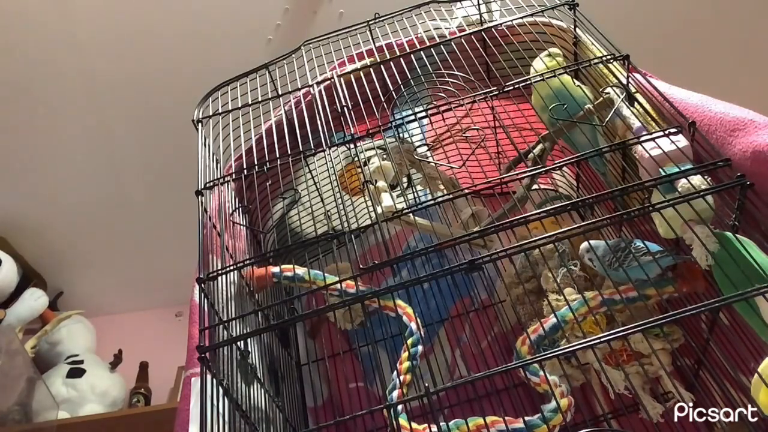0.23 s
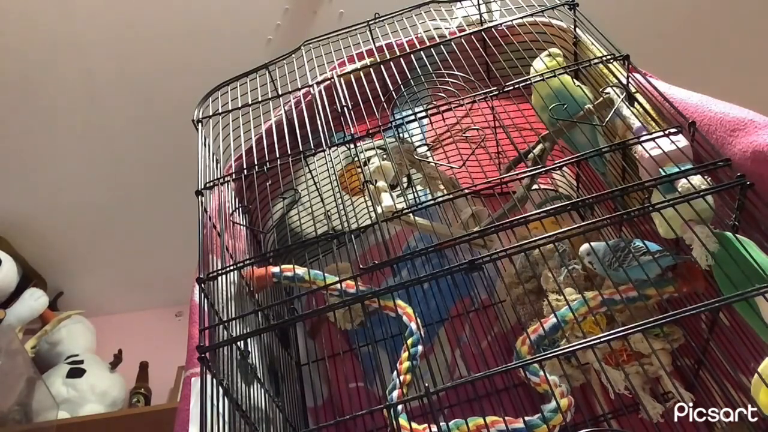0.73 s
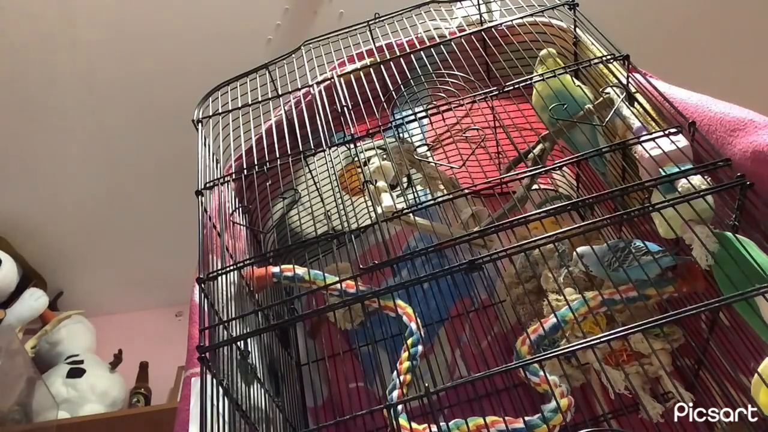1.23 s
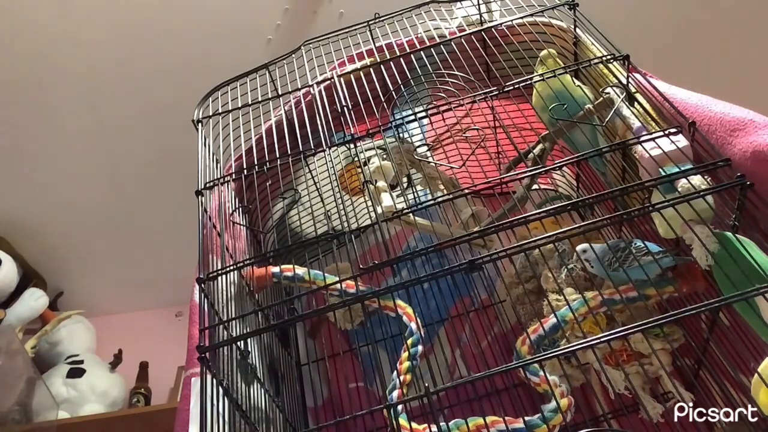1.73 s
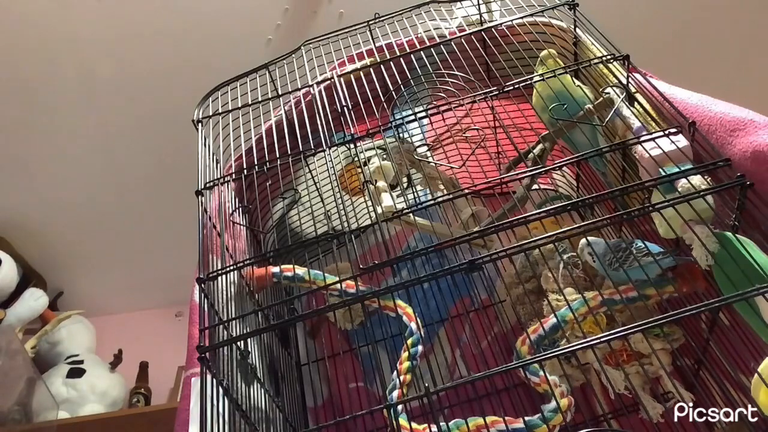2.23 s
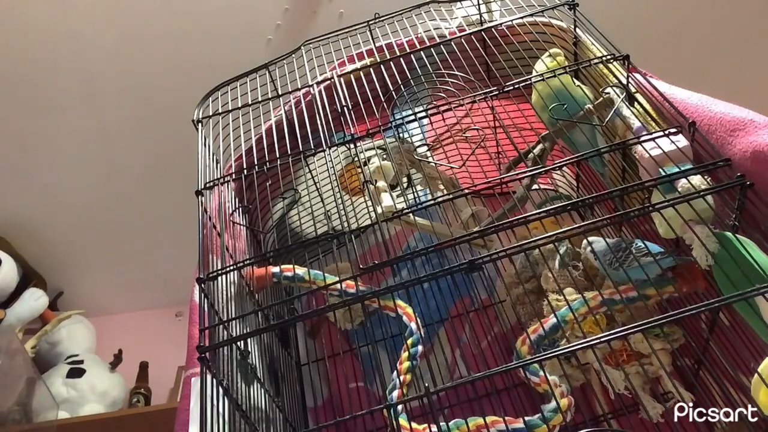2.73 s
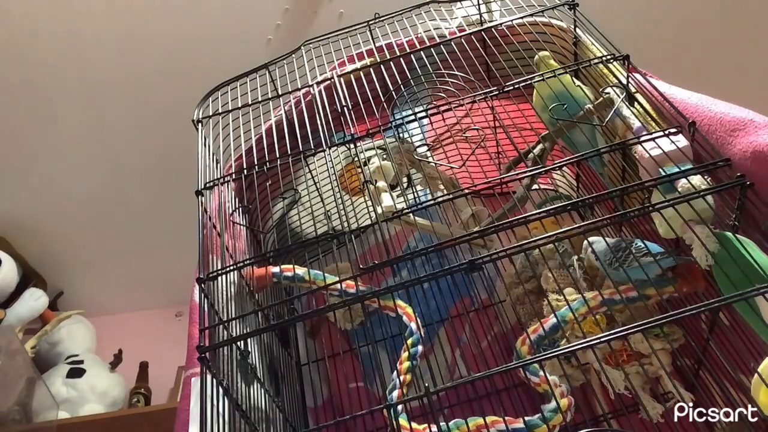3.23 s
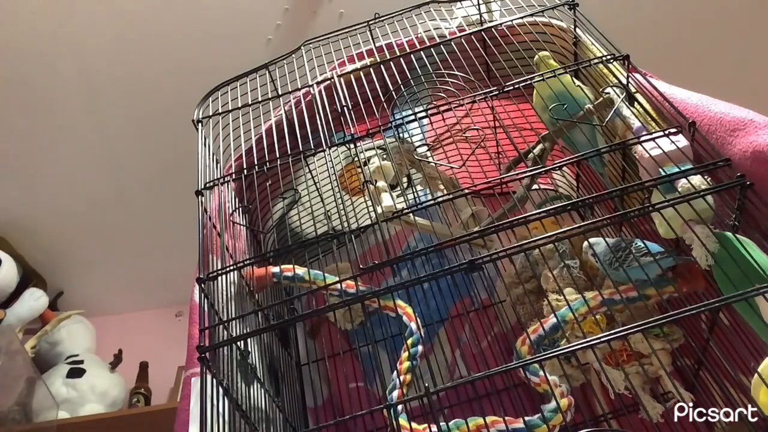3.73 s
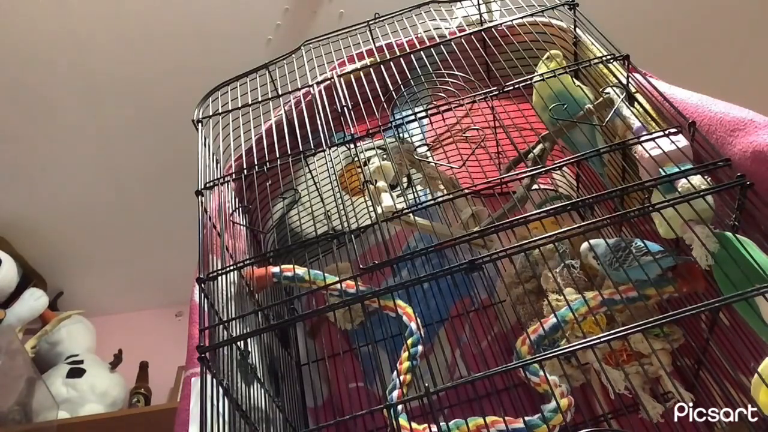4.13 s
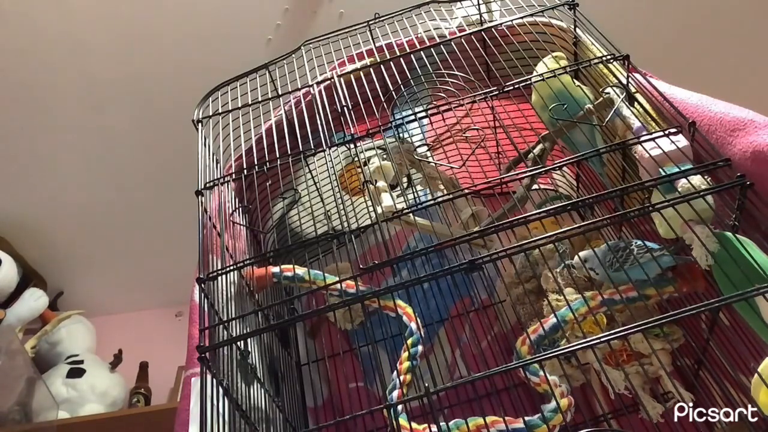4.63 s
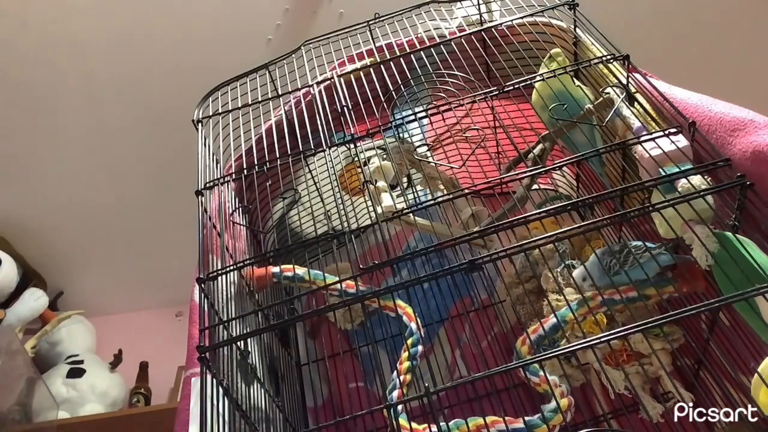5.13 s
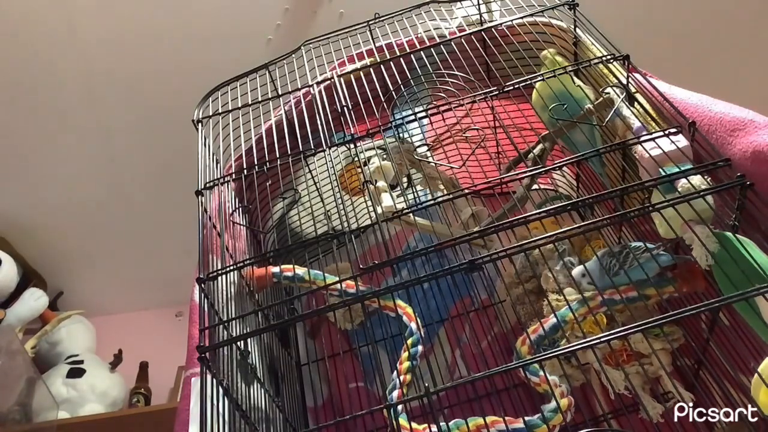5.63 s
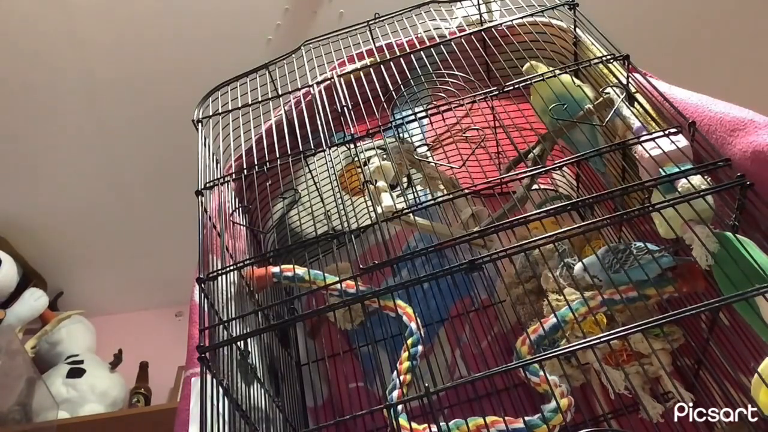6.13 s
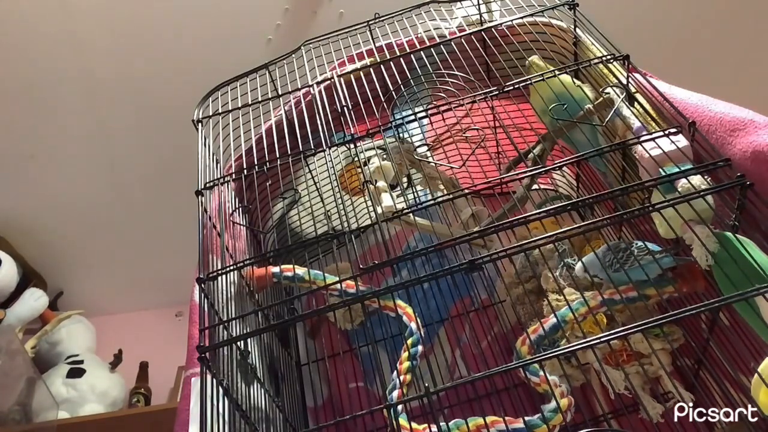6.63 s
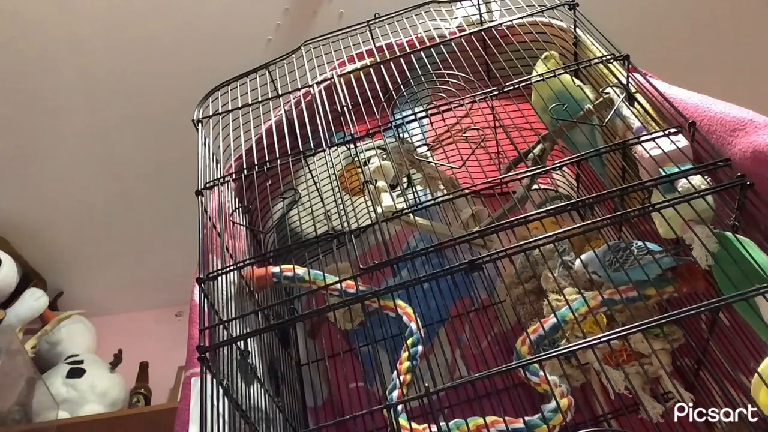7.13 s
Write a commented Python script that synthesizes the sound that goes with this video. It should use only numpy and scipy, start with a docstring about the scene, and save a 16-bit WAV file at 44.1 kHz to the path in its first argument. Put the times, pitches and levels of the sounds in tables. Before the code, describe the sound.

Several caged budgies chatter and warble in a small room, with dry clucks, raspy scolding, and a close bird's sudden sharp whistles and harsh squawks.

```python
"""Caged budgerigars in a small room.

Gliding warble syllables and peeps (rough near-sine tones) ring the resonances of the cage corner.
Clucks and raspy scolding are noise gated by uneven puffs; shuffles and taps are coloured noise.
A close bird whistles (wavering tones) and squawks (pulsed chaotic tone and noise).
Noise-tail reverb gives the short room ring; filtered noise gives the still air."""
import sys
import numpy as np
from scipy import signal
from scipy.fft import rfft, irfft
from scipy.io import wavfile

SR = 44100
rng = np.random.default_rng(int(sys.argv[2]) if len(sys.argv) > 2 else 0)


def unload_wav(signal):
    """Save mono or channel-first audio to the path in sys.argv[1] as 16-bit WAV at rate SR, clipped to [-1, 1]."""
    wavfile.write(
        sys.argv[1],
        SR,
        np.round(np.clip(np.atleast_2d(signal).T, -1, 1) * 32767).astype(np.int16),
    )


N = 325899

# Levels of events are source levels, ahead of any later colouring and room.
# Still room air, spectrum: hz, gain_db
AIR_SPECTRUM = [(20, -32), (45, -23), (65, -9.5), (100, -9.5), (300, -10.5), (700, -16), (2000, -3.5),
                (6000, -23), (16000, -32.5)]
# Birds shuffling on the perches: start_s, length_s, level_db
SHUFFLES = [(1.769, 0.11, -65), (3.621, 0.2, -57.5), (4.068, 0.329, -54)]
# Shuffle spectrum: hz, gain_db
SHUFFLE_SPECTRUM = [(40, -15), (100, 0.5), (260, 1.5), (400, 14), (580, 0.5), (750, -6), (1500, -32)]
# Beak and claw taps on the cage: start_s, level_db
TAPS = [(2.973, -33.5), (4.139, -29)]
# Tap spectrum: hz, gain_db
TAP_SPECTRUM = [(100, -46), (1500, -19), (3600, -1), (7000, 6), (12000, -2), (16000, -14)]
# Clucks: start_s, length_s, throat_db, edge_db
CLUCKS = [(0.173, 0.028, -33.5, -46), (0.71, 0.014, -55, -36.5), (0.863, 0.025, -31.5, -50),
          (1.492, 0.024, -43, -50), (1.797, 0.068, -40.5, -51), (2.054, 0.044, -49, -50),
          (2.141, 0.041, -31.5, -45), (2.711, 0.074, -37.5, -45), (3.05, 0.015, -28, -25),
          (3.337, 0.03, -29, -33), (3.616, 0.052, -49, -51), (3.721, .048, -38.5, -34),
          (3.923, 0.0354, -39, -43), (4.137, 0.0094, -34, -26), (4.341, 0.018, -32.5, -31),
          (5.476, 0.026, -33, -52), (5.549, 0.037, -35.5, -46.5), (5.937, .025, -56.5, -26),
          (7.16, 0.014, -30, -51)]
# Hollow throat of a cluck, spectrum: hz, gain_db
THROAT_SPECTRUM = [(70, -51), (450, -13.5), (900, -12), (1450, 6.5), (1900, -6), (2300, 9), (2600, 2),
                   (3000, 7), (4200, -8), (6000, -33.5)]
# Sharp edge of a cluck, spectrum: hz, gain_db
EDGE_SPECTRUM = [(100, -43), (1500, -5.5), (3600, 9.5), (4800, -1.5), (6200, 1), (7600, -3.5),
                 (9500, -11.5), (16000, -49)]
# Raspy scolding: start_s, length_s, level_db
RASPS = [(0.86, 0.24, -44), (4.428, 0.15, -24.5), (4.598, 0.19, -27.5), (4.815, 0.22, -27.5),
         (5.04, 0.18, -26.5)]
# Scolding spectrum: hz, gain_db
RASP_SPECTRUM = [(150, -70), (800, -32), (1400, -6.5), (2700, 3.5), (4500, 5), (6500, 8.5), (7500, 5),
                 (8400, -0.5), (10500, -7.5), (16000, -24.5)]
# Warble syllables, arches of pitch: top_time_s, climb_s, fall_s, top_hz, climb_db, fall_db
SYLLABLES = [ (.006, 0.0067, 0.044, 2900, -27.5, -29), (0.289, .016, .058, 2386, -35, -37),
             (.44, .068, 0.052, 2560, -43.5, -32.5), (.553, 0.048, 0.065, 3104, -39.5, -28.5),
             (.684, 0.0036, .055, 3243, -28, -29.5), (1.218, 0.024, 0.034, 3886, -26.5, -22.5),
             (1.312, .048, 0.041, 3383, -24.5, -25), (1.581, 0.0037, 0.0178, 2310, -37, -27.5),
             (1.864, 0.0033, 0.035, 3104, -29, -31), (1.955, .012, 0.023, 2423, -41, -32.5),
             (2.555, 0.0071, 0.062, 2416, -34, -36), (2.79, 0.086, .055, 2592, -38, -31.5),
             (2.91, 0.069, 0.024, 3100, -35.5, -39), (3.007, 0.0052, 0.045, 2474, -28, -29.5),
             (3.24, .065, 0.021, 2600, -37, -32.5), (3.284, 0.027, 0.045, 2797, -30, -26),
             (3.413, 0.064, .042, 3556, -23, -24), (4.035, 0.055, 0.055, 3557, -35, -42.5),
             (4.276, 0.0055, .048, 3050, -32, -34.5), (4.449, 0.0046, 0.029, 3050, -26, -28),
             (4.616, .005, 0.029, 2743, -39, -22), (4.965, 0.017, 0.13, 3276, -39, -37.5),
             (5.124, 0.011, 0.094, 3100, -28, -33.5), (5.287, .014, 0.053, 3225, -37.5, -32),
             (5.9, 0.09, 0.077, 3656, -27, -34.5), (6.52, 0.0044, 0.085, 3320, -35.5, -37),
             (6.804, 0.039, 0.064, 3200, -43.5, -34.5), (6.925, 0.06, 0.068, 2700, -34, -36.5),
             (7.218, .005, 0.063, 3140, -51.5, -38), (7.343, 0.067, 0.028, 2800, -43.5, -30)]
# Peeps, notes held near one pitch: start_s, length_s, pitch_hz, level_db, roughness
PEEPS = [ (0.087, 0.057, 2202, -39.5, 1.03), (0.5, .22, 4740, -55, 0.04), (0.752, 0.027, 1653, -42, 0),
         (0.855, 0.031, 3390, -28, 0.12), (0.884, 0.053, 4790, -26, 0.54),
         (0.924, 0.029, 2071, -28.5, 0.46), (0.948, 0.058, 3844, -25.5, 0.49),
         (1.005, 0.064, 3085, -27, 0.51), (1.321, 0.017, 2957, -23.5, 0.07), (1.697, 0.14, 4650, -54, 0.01),
         (1.857, 0.023, 909, -39, 0), (2.339, .045, 1528, -41.5, 0.29), (2.323, 0.087, 2320, -43.5, 0.65),
         (2.677, 0.087, 1600, -40.5, 0.14), (2.837, 0.084, 1623, -42, 0.16),
         (2.905, 0.068, 1313, -43, 0.03), (3.088, 0.1, 1390, -46.5, 0.4), (3.878, 0.037, 3170, -45, 0.64),
         (4.158, .03, 2316, -42.5, 0), (4.182, 0.03, 1128, -39, 0.32), (4.22, 0.042, 1430, -40.5, 0.47),
         (4.297, 0.035, 3660, -43, 0.36), (4.31, 0.067, 1598, -39.5, 0.97),
         (4.397, 0.048, 1406, -46.5, 0.1), (4.479, 0.045, 1597, -30.5, 0.11),
         (4.573, 0.035, 3080, -23, 0.3), (4.873, 0.028, 2204, -34, 0.98), (5.039, 0.04, 1400, -42.5, .8),
         (5.483, 0.034, 1622, -30, .8), (5.562, 0.05, 1479, -41, 0.26), (5.724, 0.069, 2758, -29, 0.31),
         (5.839, 0.084, 1710, -44, 0.76), (6.447, 0.025, 3166, -30, 0.57), (6.449, 0.019, 1552, -38, 0.77),
         (6.784, 0.05, 756, -43.5, 0.34), (6.793, 0.038, 1566, -43, .65), (7.1, 0.024, 1588, -35, 0.82)]
# Ringing resonances of the cage corner: hz, width_hz, gain_db
CORNER_MODES = [(1467, 226, 5), (2310, 78, 3.5), (2940, 260, -3.5), (3820, 780, -4)]
# Warble spectrum, after the corner: hz, gain_db
WARBLE_SPECTRUM = [(40, -56), (300, -40), (700, -2.5), (1300, -1), (3500, 3), (5000, -3.5), (6500, 1),
                   (7600, 16.5), (9300, -15.5), (12000, 9.5), (15000, -7.5)]
# Close bird's whistles, one list of breakpoints each: time_s, pitch_hz, level_db, roughness
WHISTLES = [
    [(2.397, 5240, -35, 0.16), (2.404, 4013, -23.5, 0.1), (2.413, 4206, -13.5, .05),
     (2.42, 4410, -33, 0.27), (2.435, 4260, -14.5, 0.14), (2.444, 4340, -26, 0.59), (2.46, 4016, -17, 0.9)],
    [(5.618, 4090, -18, 0.42), (5.623, 4390, -21, .03), (5.635, 4200, -28.5, 0.31),
     (5.647, 3660, -17.5, 0.42), (5.66, 4680, -22, 0.33), (5.685, 4880, -26, 0.8)],
    [(6.582, 4650, -33.5, 0), (6.589, 4146, -18, 0.04), (6.6, 3450, -21.5, 0.4), (6.623, 3950, -16.5, 0.22),
     (6.636, 3220, -15.5, 0.36), (6.656, 3450, -21, 0.54), (6.668, 2636, -16.5, 0.07),
     (6.692, 2740, -18.5, 0.22), (6.7, 3400, -24, .2)],
    [(6.695, 3580, -18.5, .05), (6.706, 3492, -8.5, 0.12), (6.718, 3504, -31, 0.09), (6.745, 3530, -22, 0),
     (6.763, 3540, -42, 0.1)],
]
# Whistle spectrum: hz, gain_db
WHISTLE_SPECTRUM = [(60, -21), (1000, 3), (2500, -1), (15000, 1)]
# Squawks: start_s, length_s, rise_s, first_beak_hz, last_beak_hz, level_db
SQUAWKS = [(2.461, 0.035, 0.00036, 4300, 4216, -12.5), (5.666, .058, 0.038, 4404, 7010, -9.5),
           (6.003, .12, .01, 5606, 6915, -11), (6.259, 0.12, 0.022, 5250, 6535, -11.5)]
# Squawk spectrum: hz, gain_db
SQUAWK_SPECTRUM = [(100, -47.5), (900, -34), (1500, -11), (2500, -8), (3300, 2.5), (5000, -2.5),
                   (7000, -1.5), (7700, -6), (11000, -15.5), (15500, -22)]

ROOM_T60_S, ROOM_TREBLE_T60_S, ROOM_SPLIT_HZ = 0.32, 0.2, 6000
TOP_HZ = 15900
CORNER_DIRECT_DB = -10.5
BEAK_HZ, BEAK_SPREAD_OCTAVES = 5900, .1  # cluck edge resonance, redrawn per cluck
SQUAWK_PULSE_HZ, SQUAWK_SAG_DB_PER_S = 163.5, 50

# Every note
QUAVER_PER_S, QUAVER_OCTAVES, QUAVER_DB = 99.1, .025, 2
# Syllable climb: widest and fastest; bend 1 = even glide
CLIMB_MAX_OCTAVES, CLIMB_MAX_OCTAVES_PER_S, CLIMB_BEND = .42, 17.5, .9
# Catch of the voice at the top, then attack of the fall
CATCH_S, CATCH_DB, FALL_ATTACK_S = .012, 3.5, 0.0027
# Pitch shelf in the fall, between these shares of its length
SHELF_HZ, SHELF_REACHED, SHELF_LEFT, SHELF_SAG_OCTAVES = 2406, .2, .54, 0.141
FALL_TO_HZ, FALL_FADE_DB = 1468.5, 7
STEADY_ROUGH, ROUGH_PER_OCTAVE_PER_S, END_ROUGH = .17, 0.007, 0.61
PEEP_SLIDE_OCTAVES = 0.056
# Faint random peeps
MURMUR_PER_S, MURMUR_DB, MURMUR_SPREAD_DB = 7.5, -46, 2
MURMUR_LOW_HZ, MURMUR_HIGH_HZ, MURMUR_S = 1384, 3016, .05
MURMUR_SLIDE_OCTAVES, MURMUR_ROUGH = .35, .2


def undb(db):
    """Decibels to gain."""
    return 10 ** (np.asarray(db) / 20)


def unit(x):
    """Scale to rms 1."""
    return x / np.sqrt(np.mean(x ** 2) + 1e-18)


def add(track, start_s, x):
    """Mix a sound into a track at a given time."""
    i = int(np.clip(start_s * SR, 0, N - 1))
    track[i:i + len(x)] += x[:N - i]


def colour(x, spectrum):
    """Minimum-phase filter through (hz, gain_db) points, by folding the cepstrum."""
    size = 2048
    hz, db = np.transpose(spectrum)
    log_axis = np.log(np.fft.rfftfreq(size, 1 / SR) + 1)
    log_gain = np.log(undb(np.interp(log_axis, np.log(hz), db)))
    cepstrum = irfft(log_gain)
    cepstrum[1:size // 2] *= 2
    cepstrum[size // 2 + 1:] = 0
    impulse = irfft(np.exp(rfft(cepstrum)))
    return signal.fftconvolve(x, impulse)[:len(x)]


def noise(count):
    """Fresh white noise, up to half a second."""
    return rng.standard_normal(SR // 2)[:count]


def wander(t, rate_hz):
    """Random line with a new normal value `rate_hz` times a second."""
    return np.interp(t * rate_hz, np.arange(SR // 2), noise(SR // 2))


def clock(length_s):
    """Sample times of one sound, held to 5-450 ms."""
    return np.arange(int(np.clip(length_s, .005, .45) * SR)) / SR


def swell(t, rise_s, fall_s):
    """Quarter-sine opening and closing."""
    opening = np.sin(np.pi / 2 * np.clip(t / rise_s, 0, 1))
    closing = np.sin(np.pi / 2 * np.clip((t[-1] - t) / fall_s, 0, 1))
    return opening * closing


def ring(x, hz, q):
    """Single resonance."""
    return signal.lfilter(*signal.iirpeak(hz, q, fs=SR), x)


def syrinx(t, hz, rough, second_db, third_db):
    """Nearly pure tone; roughness shakes the membrane in pitch and strength, giving a hoarse skirt."""
    shake = .13 * wander(t, 480) + .16 * wander(t, 1900)
    phase = 2 * np.pi * np.cumsum(hz * np.exp(rough * shake)) / SR
    tone = np.sin(phase) + undb(second_db) * np.sin(2 * phase)
    tone = tone + undb(third_db) * np.sin(3 * phase) * (3 * hz < SR / 2)
    tremor = np.exp(.6 * rough * wander(t, 330)) + .6 * rough * wander(t, 1600)
    return unit(tone * tremor)


def buzz(t, rate_hz, jitter, open_share, leak):
    """Uneven train of sharp puffs as the syrinx slaps open and shut."""
    cycle = np.cumsum(rate_hz * np.exp(jitter * wander(t, rate_hz))) / SR
    puff = np.exp(-(cycle % 1) / open_share) + leak
    return unit(puff * undb(1.3 * wander(t, rate_hz)))


def nearby(x, count=3):
    """Random reflections 0.5-5 ms late off objects next to the bird; energy is kept."""
    out = np.pad(x, (0, SR // 200))
    for lag in rng.integers(SR // 2000, SR // 200, count):
        out[lag:lag + len(x)] += .45 * x
    return out * np.sqrt(np.sum(x ** 2) / np.sum(out ** 2))


def room(x, wet_db):
    """Direct sound, sparse early echoes and a dense tail whose treble dies sooner."""
    t = np.arange(SR) / SR
    scatter = rng.standard_normal(SR) * np.clip((t - .003) / 0.0094, 0, 1)
    echoes = rng.standard_normal(SR) * (rng.random(SR) < 700 / SR) * (t > .002)
    scatter += 13 * echoes * np.exp(-t / 0.02)  # the nearest walls answer first and strongest
    low = signal.sosfilt(signal.butter(2, ROOM_SPLIT_HZ, fs=SR, output="sos"), scatter)
    high = signal.sosfilt(signal.butter(2, ROOM_SPLIT_HZ, "high", fs=SR, output="sos"), scatter)
    low_tail = low * np.exp(-np.log(1000) * t / ROOM_T60_S)
    high_tail = high * np.exp(-np.log(1000) * t / ROOM_TREBLE_T60_S)
    impulse = unit(low_tail - high_tail) / np.sqrt(SR)
    wet = undb(wet_db)
    return (x + wet * signal.fftconvolve(x, impulse)[:N]) / np.hypot(1, wet)


def still_air():
    """Steady room air: filtered white noise."""
    return undb(-61.5) * unit(colour(rng.standard_normal(N), AIR_SPECTRUM))


def shuffles():
    """Birds moving on the perches: dull noise with a random flutter."""
    out = np.zeros(N)
    for start_s, length_s, level_db in SHUFFLES:
        t = clock(length_s)
        rustle = unit(colour(noise(len(t)), SHUFFLE_SPECTRUM)) * undb(1.5 * wander(t, 40))
        add(out, start_s, undb(level_db) * swell(t, 0.046, 0.047) * rustle)
    return out


def taps():
    """Bright taps on the cage wire: noise with a 2.1 ms decay."""
    out = np.zeros(N)
    for start_s, level_db in TAPS:
        t = clock(.03)
        strike = unit(colour(noise(len(t)), TAP_SPECTRUM))
        add(out, start_s, undb(level_db) * np.exp(-t / 0.0021) * strike)
    return out


def clucks():
    """Short dry noise buzzes: a hollow throat plus a sharp edge that rings in the beak."""
    out = np.zeros(N)
    for start_s, length_s, throat_db, edge_db in CLUCKS:
        t = clock(length_s)
        beak_hz = BEAK_HZ * 2 ** (BEAK_SPREAD_OCTAVES * rng.standard_normal())
        puffs = noise(len(t)) * buzz(t, 210, jitter=.2, open_share=0.41, leak=.03)
        throat = unit(colour(puffs, THROAT_SPECTRUM))
        edge = colour(puffs, EDGE_SPECTRUM)
        edge = unit(edge + undb(-1.5) * ring(edge, beak_hz, q=8))
        voice = undb(throat_db) * throat + undb(edge_db) * edge
        add(out, start_s, nearby(swell(t, 0.004, 0.006) * voice))
    return out


def rasps():
    """Hoarse scolding: swelling hiss with a fast, irregular flutter."""
    out = np.zeros(N)
    for start_s, length_s, level_db in RASPS:
        t = clock(length_s)
        flutter = buzz(t, 280, jitter=0.56, open_share=0.64, leak=0.41)
        hiss = unit(colour(noise(len(t)) * flutter, RASP_SPECTRUM))
        add(out, start_s, undb(level_db) * nearby(swell(t, 0.052, 0.17) * hiss))
    return out


def note(t, hz, db, rough):
    """Soft quavering note; high, loud notes are richer in overtones."""
    effort_db = 13 * np.log2(np.mean(hz) / 3000) + 0.084 * (np.mean(db) + 39.0)
    hz = hz * 2 ** (QUAVER_OCTAVES * wander(t, QUAVER_PER_S))
    strength = undb(db + QUAVER_DB * wander(t, QUAVER_PER_S)) * swell(t, 0.00057, 0.0037)
    return strength * syrinx(t, hz, rough, second_db=effort_db - 20, third_db=effort_db - 32)


def peep(length_s, hz, db, rough, slide_octaves):
    """Held note with a slight glide, centred on its pitch."""
    t = clock(length_s)
    return note(t, hz * 2 ** (slide_octaves * (t / t[-1] - .5)), db, rough)


def syllable(climb_s, fall_s, top_hz, climb_db, fall_db):
    """Pitch climbs, catches, moves with a fresh push onto a shelf, breaks off low; fast glides are hoarse."""
    t = clock(climb_s + fall_s)
    up = np.clip(t / climb_s, 0, 1)
    down = np.clip((t - climb_s) / fall_s, 0, 1)
    climb_octaves = min(CLIMB_MAX_OCTAVES, CLIMB_MAX_OCTAVES_PER_S * climb_s)
    fall_octaves = np.log2(top_hz / FALL_TO_HZ)

    fall_hz = [top_hz, SHELF_HZ, SHELF_HZ / 2 ** SHELF_SAG_OCTAVES, FALL_TO_HZ]
    hz = np.interp(down, [0, SHELF_REACHED, SHELF_LEFT, 1], fall_hz)
    hz = hz * 2 ** (climb_octaves * (up ** CLIMB_BEND - 1))

    db = np.interp(t - climb_s, [-CATCH_S, 0, FALL_ATTACK_S], [climb_db, climb_db - CATCH_DB, fall_db])
    db = db - FALL_FADE_DB * down ** 2

    octaves_per_s = np.where(t < climb_s, climb_octaves / climb_s, fall_octaves / fall_s)
    rough = STEADY_ROUGH + ROUGH_PER_OCTAVE_PER_S * octaves_per_s + END_ROUGH * down ** 2
    return note(t, hz, db, rough)


def murmur():
    """Faint peeps from the back of the cage, one at a random moment of each slot."""
    out = np.zeros(N)
    draws = rng.random((int(MURMUR_PER_S * N / SR), 4))
    for slot, (when, height, loud, slide) in enumerate(draws):
        hz = MURMUR_LOW_HZ * (MURMUR_HIGH_HZ / MURMUR_LOW_HZ) ** height
        db = MURMUR_DB + MURMUR_SPREAD_DB * (2 * loud - 1)
        slide_octaves = MURMUR_SLIDE_OCTAVES * (2 * slide - 1)
        add(out, (slot + when) / MURMUR_PER_S, peep(MURMUR_S, hz, db, MURMUR_ROUGH, slide_octaves))
    return out


def corner(x):
    """Cage corner: attenuated direct sound plus parallel resonances."""
    modes = sum(undb(db) * ring(x, hz, q=hz / width_hz) for hz, width_hz, db in CORNER_MODES)
    return undb(CORNER_DIRECT_DB) * x + modes


def warble():
    """Flock's syllables and peeps over the murmur, ringing the corner as they pass its resonances."""
    out = murmur()
    for top_time_s, climb_s, *shape in SYLLABLES:
        add(out, top_time_s - climb_s, syllable(climb_s, *shape))
    for start_s, *shape in PEEPS:
        add(out, start_s, peep(*shape, PEEP_SLIDE_OCTAVES))
    return colour(corner(out), WARBLE_SPECTRUM)


def whistles():
    """Loud wavering tones of the close bird, with a little hiss where rough."""
    out = np.zeros(N)
    for rows in WHISTLES:
        time_s, *columns = np.transpose(rows)
        t = clock(time_s[-1] - time_s[0])
        hz, db, rough = (np.interp(t + time_s[0], time_s, column) for column in columns)
        tone = syrinx(t, hz, rough, second_db=-27, third_db=-38)
        hiss = undb(-28) * rough * noise(len(t))
        add(out, time_s[0], undb(db) * swell(t, 0.0013, 0.0024) * (tone + hiss))
    return colour(out, WHISTLE_SPECTRUM)


def squawks():
    """Harsh sagging pulse trains: each puff holds a chaotic tone at the beak resonance and broad noise."""
    out = np.zeros(N)
    for start_s, length_s, rise_s, first_hz, last_hz, level_db in SQUAWKS:
        t = clock(length_s)
        hz = np.linspace(first_hz, last_hz, len(t)) * np.exp(0.135 * wander(t, 2500))
        source = np.sin(2 * np.pi * np.cumsum(hz) / SR) + undb(-2.0) * noise(len(t))
        puffs = source * buzz(t, SQUAWK_PULSE_HZ, jitter=.05, open_share=.36, leak=.18)
        rounded = np.tanh(puffs / 2)  # soft limit rounds off the tallest puffs, for a less spiky squawk
        voice = unit(colour(rounded, SQUAWK_SPECTRUM))
        level = undb(level_db - SQUAWK_SAG_DB_PER_S * t)
        add(out, start_s, level * swell(t, rise_s, 0.016) * voice)
    return out


def scene():
    """Still air, the flock deep in the cage (wetter), the close bird in front (drier)."""
    air = still_air()
    flock = room(clucks() + rasps() + shuffles(), wet_db=8.0)
    flock = flock + room(undb(-0.5) * warble(), wet_db=3.5)
    close = room(squawks() + taps(), wet_db=-5) + room(whistles(), wet_db=-4.5)
    return (air + flock + close)[None]


def record(dry):
    """Steep elliptic low-pass at TOP_HZ."""
    return signal.sosfilt(signal.ellip(10, .2, 70, TOP_HZ, fs=SR, output="sos"), dry)


dry = scene()
out = record(dry)
unload_wav(out)
```